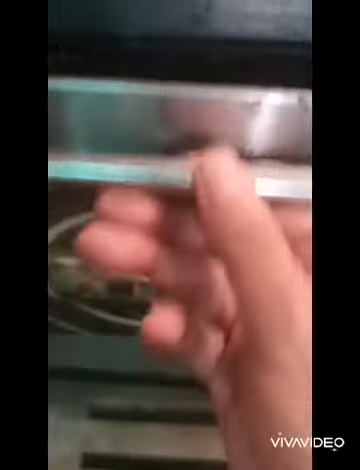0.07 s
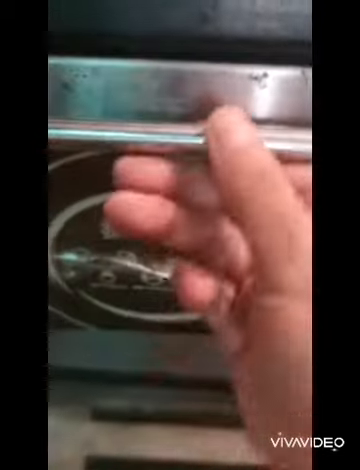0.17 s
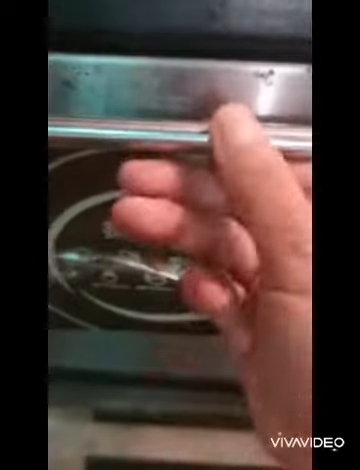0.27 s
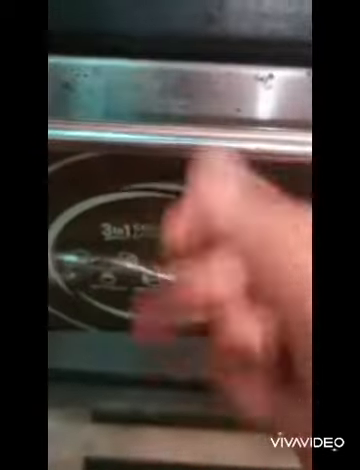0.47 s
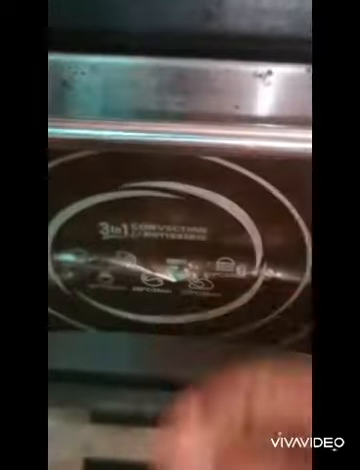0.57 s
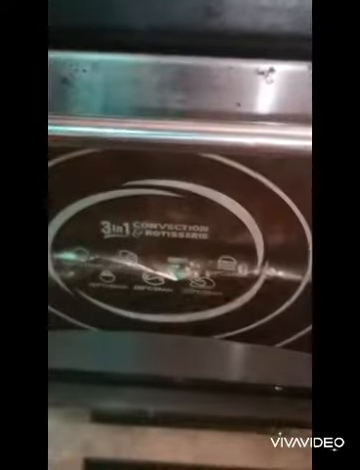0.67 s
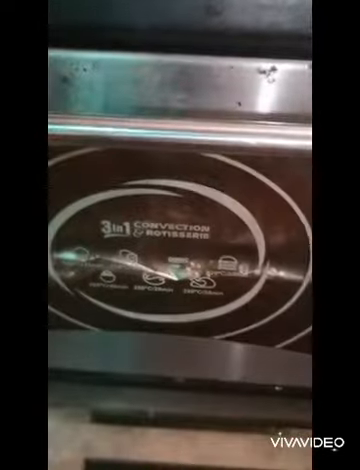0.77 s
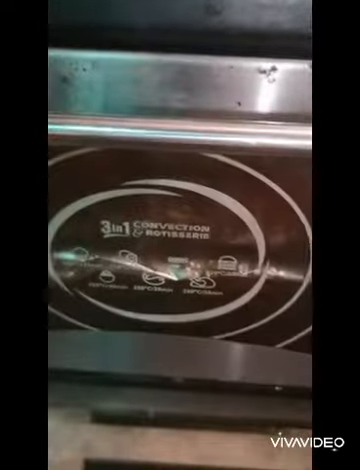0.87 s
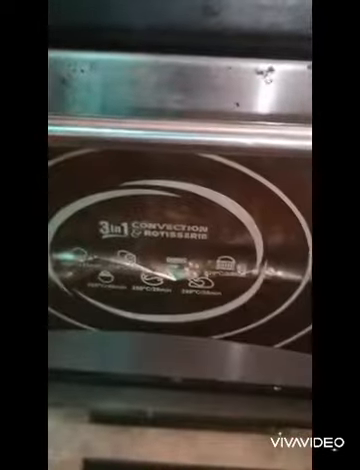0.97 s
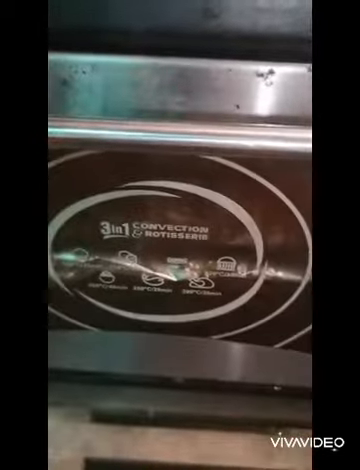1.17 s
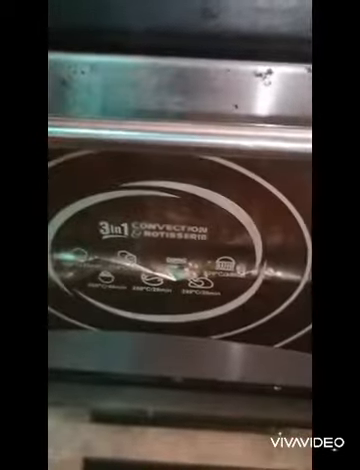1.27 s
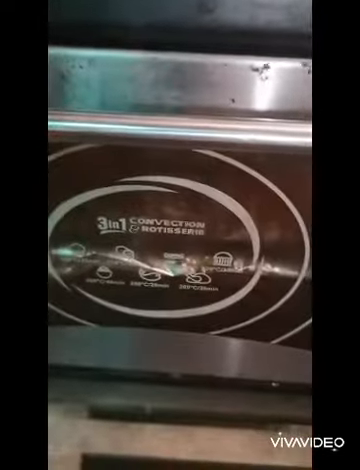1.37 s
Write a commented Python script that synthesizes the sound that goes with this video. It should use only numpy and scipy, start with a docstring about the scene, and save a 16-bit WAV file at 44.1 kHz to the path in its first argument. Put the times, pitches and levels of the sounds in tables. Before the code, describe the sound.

An oven door is pushed shut with a short hinge groan, a thump and a click.

```python
"""The door of a small oven is pushed shut by hand in a quiet kitchen.
After a few light ticks the hinge sticks and slips in a groan, the door body rumbles under the hand
and the latch scrapes over its catch. The door thumps home, the rack clatters and the panel hums
until the seal damps it. The latch clicks, the cabinet shudders as the hand leaves, and a few faint
ticks follow over a low room noise."""
import sys
import numpy as np
from scipy import signal
from scipy.fft import rfft, irfft, next_fast_len
from scipy.io import wavfile
from scipy.ndimage import uniform_filter1d

SR = 44100
rng = np.random.default_rng(int(sys.argv[2]) if len(sys.argv) > 2 else 0)


def transcribe(u):
    """Save the signal u as a 16-bit wav file named by the first command-line argument.

    u: samples, shape (n,) or (channels, n), limited to [-1, 1]; the rate is SR.
    q: integer samples, one column per channel.
    """
    v = np.clip(np.atleast_2d(u).T, -1, 1)
    q = np.round(v * 32767).astype(np.int16)
    wavfile.write(sys.argv[1], SR, q)


N = 61739
T = np.arange(N) / SR

# The door hitting its frame: start_s, strength_db, contact_ms
DOOR_BLOWS = [(0.3586, -1.5, 0.23), (0.3632, -8.5, 0.17), (0.3706, -20, 0.24), (.437, -12, 7.5)]
# The body of the thump: pitch_hz, gain_db, t60_s
DOOR_MODES = [(103.4, -38, 0.6), (164.4, -36, 0.36), (215.3, -33.5, 0.14), (385, -37, 0.054),
              (475, -23, 0.025), (756, -18, 0.057), (846, -26.5, 0.023), (963, -20.5, 0.014),
              (1378, -37, 0.065), (1590, -27, 0.038), (1910, -31, 0.015), (2260, -34, 0.029),
              (2320, -18.5, 0.018)]
# Tone of the rack and sheet metal shaken inside: frequency_hz, gain_db
CLATTER_EQ = [(200, -8.5), (370, 1), (560, -1), (740, 5.5), (950, 1), (1170, -3), (1400, -6), (2400, -4.5),
              (3100, -17), (5000, -26), (14000, -72)]
SLAM_S = DOOR_BLOWS[0][0]


def door_thump(cushion_hz=2550, rebound_ms=1.767):
    """Blows cushioned by the seal ring the door, the first with a dull crack; the inside clatters."""
    pulses = [np.exp(-np.pi * ((T - start) * 1000 / ms) ** 2) for start, _, ms in DOOR_BLOWS]
    force = sum(from_db(db) * pulse / pulse.sum() for pulse, (_, db, _) in zip(pulses, DOOR_BLOWS))
    crack = from_db(-15) * pulses[0]
    thump = rolloff(ring(force, DOOR_MODES) + crack, "low", cushion_hz, order=6)
    thump = thump - delayed(thump, rebound_ms)  # the door springs back against each blow
    thump = rolloff(thump, "high", hz=97)
    clatter = equalise(noise() * decay(SLAM_S, t60_s=0.32), CLATTER_EQ)
    return thump + from_db(-16.5) * kitchen_reverb(thump) + from_db(-32) * clatter


def panel_hum(pitch_hz=244.7, attack_s=0.0022, seal_start_s=0.452, grip_s=0.033, seal_loss_db=13):
    """The wide door panel hums on after the blow until the seal grips and damps it."""
    attack = 1 - np.exp(-np.maximum(T - SLAM_S, 0) / attack_s)
    damping_db = seal_loss_db * np.clip((T - seal_start_s) / grip_s, 0, 1)
    return from_db(-21 - damping_db) * attack * ping(SLAM_S, pitch_hz, t60_s=0.56)


# Swell of the hinge's low groan: time_s, level_db
GROAN_ENVELOPE = [(0, -53), (.035, -48), (.07, -69), (.18, -64), (.192, -46), (.205, -30), (.216, -25),
                  (.228, -33), (.241, -25.5), (.265, -31.5), (.284, -37.5), (.297, -42), (.326, -37.5),
                  (.342, -74), (.36, -90)]
# The squeak that the slips ring in the door: pitch_hz, gain_db, t60_s
SLIP_MODES = [(351, 5.5, 0.039), (705, -5, 0.027), (815, -2.5, 0.046), (953, 0, 0.14), (1000, -2, 0.064),
              (1580, 1.5, 0.0089), (1800, -14, 0.026), (2385, -7, 0.05), (2700, -35, 0.049)]


def hinge_groan(pitch_hz=235.7, wander=0.02, jitter_cycles=0.061, squeak_lead_s=0.0037):
    """Stick-slip locks to the door panel: a clean low tone, with uneven slips ringing the door."""
    drift = unit_rms(uniform_filter1d(noise(), size=900))
    cycles = np.cumsum(pitch_hz * (1 + wander * drift)) / SR
    uneven_cycles = cycles + jitter_cycles * unit_rms(uniform_filter1d(noise(), size=200))
    slips = np.diff(np.floor(np.maximum.accumulate(uneven_cycles)), prepend=0)  # one a cycle
    rub = 0.11 * noise()
    effort = envelope(GROAN_ENVELOPE)
    groan = effort * unit_rms(np.sin(2 * np.pi * cycles))
    friction = np.interp(T + squeak_lead_s, T, effort / effort.max()) ** 0.79
    squeak = from_db(-40) * friction * hold_level(ring(slips + rub, SLIP_MODES))
    break_loose = from_db(-39) * ping(start_s=0.187, pitch_hz=968.6, t60_s=0.15)
    return break_loose + groan + squeak


# Swell of the latch sliding over its catch: time_s, relative_db
SCRAPE_ENVELOPE = [(.292, -70), (.295, -46), (.308, -47), (.318, -44), (.333, -47), (.345, -43.5),
                   (.359, -43), (.367, -60)]
# Bright metal tone of the latch: frequency_hz, gain_db
LATCH_EQ = [(400, -18), (730, 12), (1150, -12.5), (1800, -1), (2500, 6), (3300, -6), (4300, -7.5),
            (5600, -3), (7500, -2.5), (8300, -7.5), (9100, 0.5), (10600, -11.5), (14500, -17)]


def latch_scrape(grains_per_s=4000, spread_db=3, jerk_s=0.002, jerk_db=2, gain_db=2):
    """The hook slides in with small jerks, snagging in a dense stream of tiny grains."""
    grains = (rng.random(N) < grains_per_s / SR) * rng.choice([-1, 1], N)
    grains = grains * from_db(spread_db * noise())
    jerks = from_db(jerk_db * np.interp(T / jerk_s, np.arange(N), noise()))
    texture = hold_level(equalise(grains * jerks, LATCH_EQ), window_samples=600)
    scrape = from_db(gain_db) * envelope(SCRAPE_ENVELOPE) * texture
    return scrape + from_db(-2.5) * kitchen_reverb(scrape)


# Clicks of the latch and casing: start_s, strength_db, chatter_decay_s, treble_db, pitch_hz, ring_db
CLICKS = [(.002, -32, 0.017, -3.5, 1700, -49), (0.119, -34.5, 0.012, -2.5, 9500, -60.5),
          (0.227, -36, 0.02, -2, 2540, -66), (.294, -20, 0.0061, -26, 1830, -45.5),
          (0.5, -29, 0.018, 0.5, 7860, -51), (0.5165, -21.5, 0.0061, -2, 1511, -44.5),
          (.52, -22, 0.011, 3.5, 2360, -64), (0.649, -41.5, .012, -2, 9700, -69),
          (0.734, -37, .016, 5, 956, -45.5), (0.74, -53, 0.024, -5, 1590, -45),
          (0.909, -31.5, 0.021, -13, 7860, -74), (1.1715, -32, 0.016, -0.5, 2700, -52.5),
          (1.177, -41, .02, 2, 9450, -64)]
# Crisp tone of their chatter: frequency_hz, gain_db
CLICK_EQ = [(400, -30), (1100, -17), (1700, 5), (3300, 2.5), (4300, -5.5), (5800, 0), (7400, 3.5),
            (8400, -1), (9400, 3), (10800, -9.5), (14500, -10.5)]


def metal_clicks(treble_hz=9500):
    """Small hard contacts: each a brief chatter that fills the room, and one short metallic ring."""
    chatter, rings = 0, 0
    lowpass = signal.butter(2, treble_hz, fs=SR, output="sos")
    for start_s, strength_db, decay_s, treble_db, pitch_hz, ring_db in CLICKS:
        grit = noise()
        dull = signal.sosfiltfilt(lowpass, grit)
        fade = (T >= start_s) * np.exp(-np.maximum(T - start_s, 0) / decay_s)
        burst = (dull + from_db(treble_db) * (grit - dull)) * fade
        chatter += from_db(strength_db) * burst / np.sqrt(decay_s * SR / 2)
        rings += from_db(ring_db) * ping(start_s, pitch_hz, t60_s=0.066)
    chatter = equalise(chatter, CLICK_EQ)
    return rings + chatter + from_db(-5.5) * kitchen_reverb(chatter)


# Swell of the door's rumble during the push: time_s, level_db
PUSH_ENVELOPE = [(.185, -48), (.215, -43.5), (.28, -43), (.325, -54.5), (.37, -35), (.45, -41), (.49, -49),
                 (.56, -57)]
# Its bass-heavy tone: frequency_hz, gain_db
BOOM_EQ = [(25, -35), (60, -3.5), (105, 9.5), (170, 0), (215, -8), (300, -0.5), (450, -44.5)]


def door_boom():
    """The door body rumbles low under the hand."""
    return hold_level(equalise(noise(), BOOM_EQ)) * envelope(PUSH_ENVELOPE)


# Swell of the cabinet's shudder: time_s, level_db
SHUDDER_ENVELOPE = [(.635, -70), (.652, -41), (.672, -40.5), (.72, -42.5), (.75, -43.5), (.8, -58),
                    (.92, -56.5)]
# Its low sway: pitch_hz, gain_db, t60_s
CABINET_MODES = [(54.6, -2.5, 0.83), (94.2, -2, 0.43), (137.3, -4, 0.3), (176.5, -8, 0.21),
                 (240.7, 0.5, 0.18)]
# Rattles of loose sheet metal: start_s, level_db
SHEET_RATTLES = [(0.643, -49), (0.697, -62), (0.735, -57.5)]
# Their tinny tone: frequency_hz, gain_db
RATTLE_EQ = [(300, -8), (520, -10), (950, -1), (1200, -6.5), (1600, -1), (2000, -3), (2800, -6),
             (3700, -24.5), (9500, -19.5), (14000, -35)]


def cabinet_shudder():
    """As the hand lets go, the cabinet sways on its feet and its sheet metal rattles faintly."""
    sway = hold_level(ring(noise(), CABINET_MODES)) * envelope(SHUDDER_ENVELOPE)
    shaking = sum(from_db(db) * decay(start_s, t60_s=0.34) for start_s, db in SHEET_RATTLES)
    return sway + shaking * equalise(noise(), RATTLE_EQ)


# Length of the kitchen's tail: frequency_hz, t60_s
KITCHEN_DECAY = [(300, 0.54), (800, 0.37), (2000, 0.093), (5000, 0.22), (9000, 0.23), (15000, 0.12)]


def kitchen_reverb(sound, build_s=0.0012):
    """Reflections of the small room: half-octave bands, each dying at its own rate."""
    size = next_fast_len(N)
    hz = np.arange(size // 2 + 1) * SR / size
    white = np.exp(2j * np.pi * rng.random(len(hz)))
    bands = np.round(2 * np.log2(np.clip(hz, 200, 16000)))
    tail = 0
    for band in np.unique(bands):
        t60_s = at_hz(KITCHEN_DECAY, 2 ** (band / 2))
        tail += irfft(white * (bands == band), size)[:N] * decay(0, t60_s)
    tail = rolloff(tail * (1 - np.exp(-T / build_s)), "high", hz=328, order=2)
    return signal.fftconvolve(sound, tail / np.sqrt(np.sum(tail ** 2)))[:N]


# The bed of room noise: frequency_hz, gain_db
ROOM_EQ = [(20, -3), (35, 1), (58, 6), (80, -6.5), (138, 1), (185, -14.5), (280, -14), (400, -21.5),
           (550, -23.5), (850, -21.5), (1600, -20.5), (2700, -18.5), (3600, -30), (5000, -35), (9300, -40),
           (11500, -53), (15000, -54)]


def room_tone(start_db=-53, fall_db_per_s=2):
    """Low rumble and soft hiss of the room, easing down slightly."""
    return from_db(start_db - fall_db_per_s * T) * unit_rms(equalise(noise(), ROOM_EQ))


def noise():
    """White noise at unit level."""
    return rng.standard_normal(N)


def from_db(db):
    """Decibels to gain."""
    return 10 ** (np.asarray(db) / 20)


def unit_rms(sound):
    """Scale to unit rms."""
    return sound / np.sqrt(np.mean(sound ** 2) + 1e-20)


def hold_level(sound, window_samples=2205):
    """Ride the gain to hold a sound at unit level."""
    return sound / np.sqrt(np.abs(uniform_filter1d(sound ** 2, window_samples)) + 1e-20)


def envelope(rows):
    """Gain over time from (time_s, level_db) rows, silent outside them."""
    time_s, level_db = np.transpose(rows)
    return from_db(np.interp(T, time_s, level_db, left=-120, right=-120))


def decay(start_s, t60_s):
    """Sudden start, exponential decay."""
    return (T >= start_s) * np.exp(-np.log(1000) * np.maximum(T - start_s, 0) / t60_s)


def ping(start_s, pitch_hz, t60_s):
    """One dying sine."""
    return decay(start_s, t60_s) * np.sin(2 * np.pi * pitch_hz * (T - start_s))


def ring(force, modes):
    """A force drives modes that each ring as a dying sine."""
    ringing = 0
    for pitch_hz, gain_db, t60_s in modes:
        radius = np.exp(-np.log(1000) / (t60_s * SR))
        angle = 2 * np.pi * pitch_hz / SR
        feedback = [1, -2 * radius * np.cos(angle), radius * radius]
        ringing += from_db(gain_db) * signal.lfilter([0, np.sin(angle)], feedback, force + 1e-18)
    return ringing


def at_hz(rows, hz):
    """Read (frequency_hz, value) rows on a log-frequency axis."""
    frequencies, values = np.transpose(rows)
    return np.interp(np.log(np.maximum(hz, 1)), np.log(frequencies), values)


def equalise(sound, curve):
    """Minimum-phase EQ with the given curve and unit power gain."""
    size = 2 * next_fast_len(N)
    gain = unit_rms(from_db(at_hz(curve, np.arange(size // 2 + 1) * SR / size)))
    cepstrum = irfft(np.log(gain))
    cepstrum[1:size // 2] *= 2
    cepstrum[size // 2 + 1:] = 0
    return irfft(rfft(sound, size) * np.exp(rfft(cepstrum)))[:N]


def rolloff(sound, keep, hz, order=1):
    """Pass the "low" or "high" side of a corner frequency."""
    return signal.sosfilt(signal.butter(order, hz, keep, fs=SR, output="sos"), sound)


def delayed(sound, ms):
    """The same sound, later."""
    return np.interp(T - ms / 1000, T, sound)


def scene():
    """The right side is open; the left hears the same sound later and muffled."""
    right = (hinge_groan() + latch_scrape() + door_thump() + panel_hum()
             + metal_clicks() + door_boom() + cabinet_shudder() + room_tone())
    left = from_db(0.5) * delayed(rolloff(right, "low", hz=282), ms=0.49)
    return np.array([left, right])


# Tone of the microphone hiss: frequency_hz, gain_db
HISS_EQ = [(100, 5.5), (1500, 9.5), (3000, 8.5), (6000, 0.5), (15000, -3)]


def record(dry, hiss_db=-73.5, cutoff_hz=15050):
    """Faint microphone hiss joins each side and the very top is cut."""
    hiss = from_db(hiss_db) * np.array([equalise(noise(), HISS_EQ) for _ in range(2)])
    top_cut = signal.ellip(10, 0.2, 80, cutoff_hz, fs=SR, output="sos")
    return signal.sosfilt(top_cut, dry + hiss)


dry = scene()
out = record(dry)
transcribe(out)
```